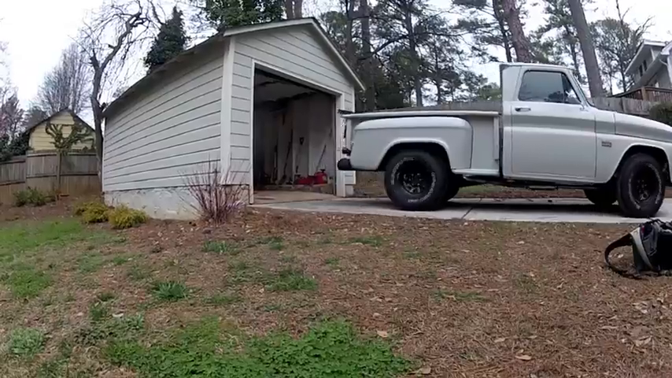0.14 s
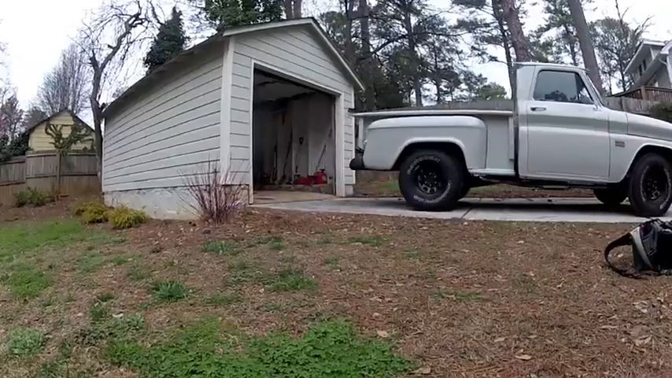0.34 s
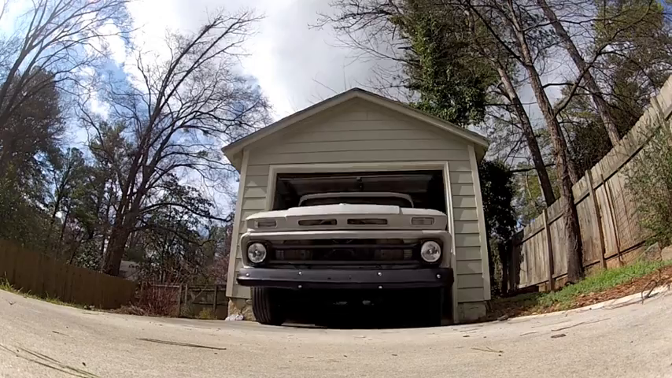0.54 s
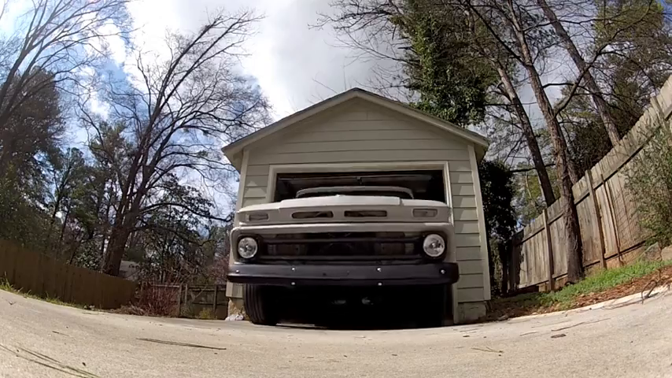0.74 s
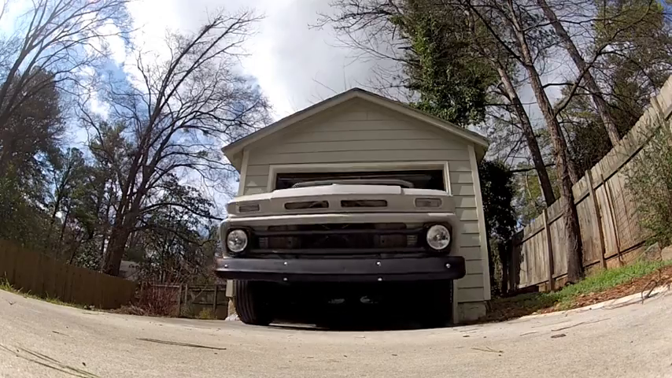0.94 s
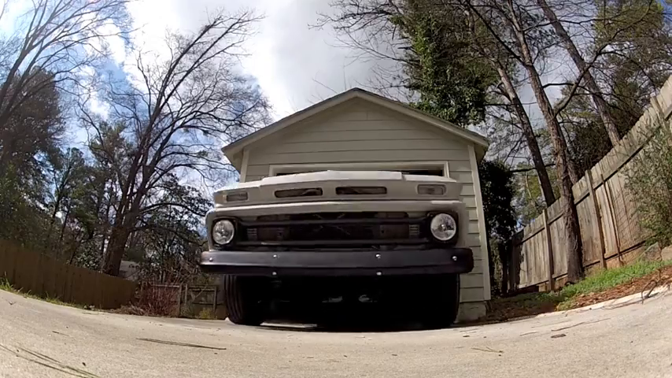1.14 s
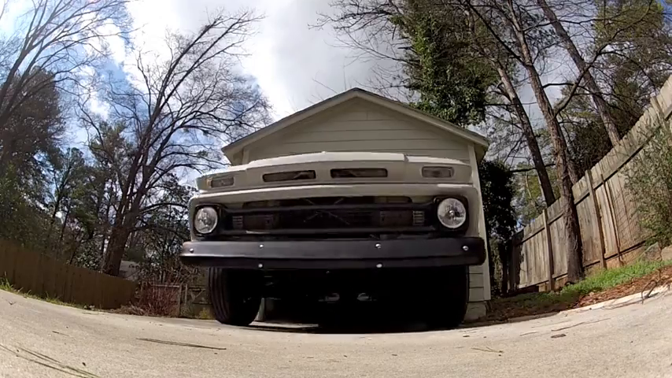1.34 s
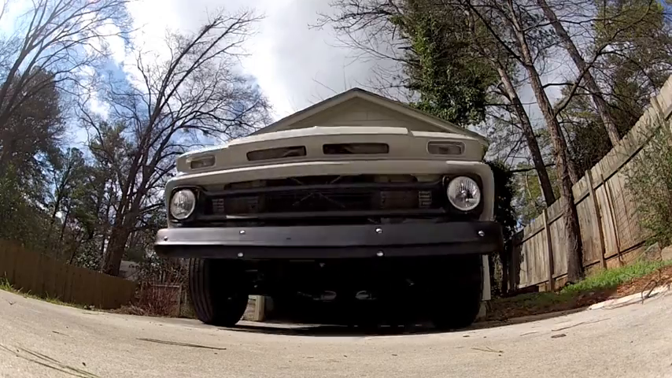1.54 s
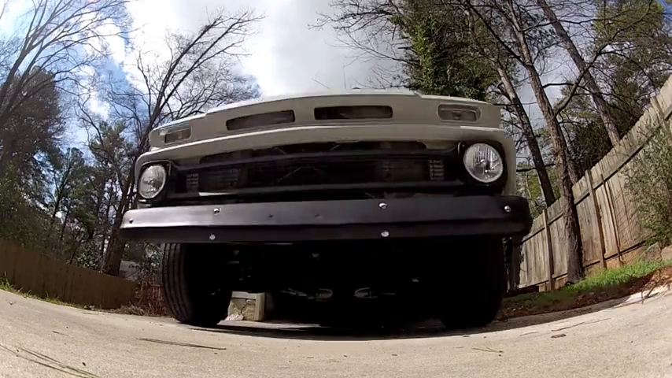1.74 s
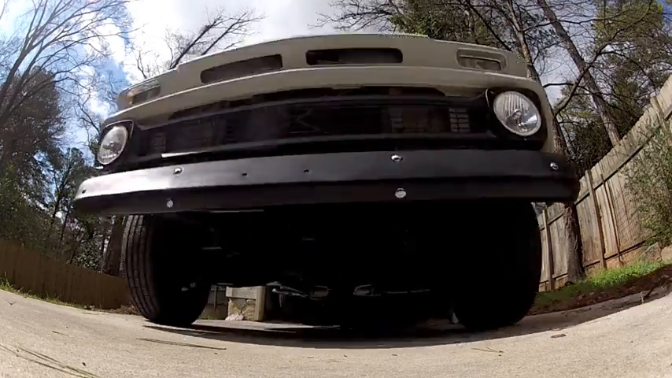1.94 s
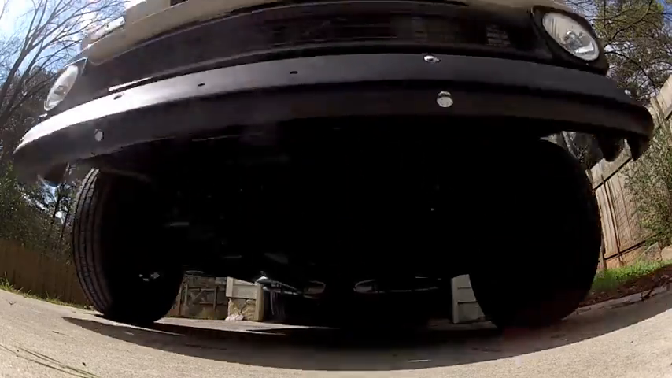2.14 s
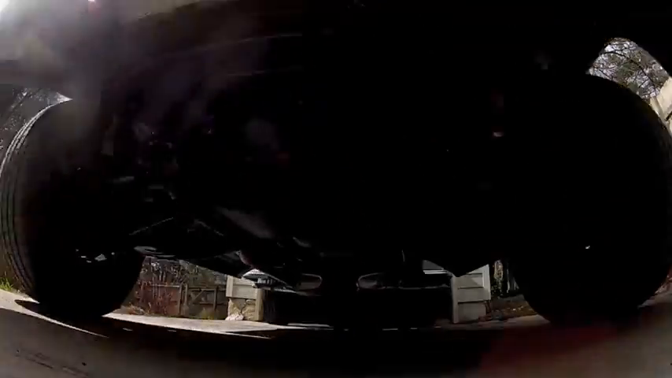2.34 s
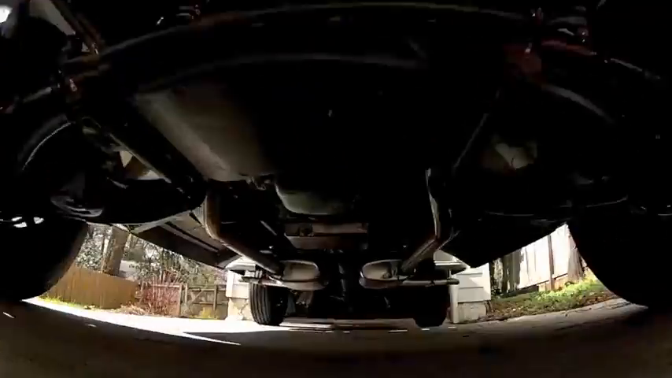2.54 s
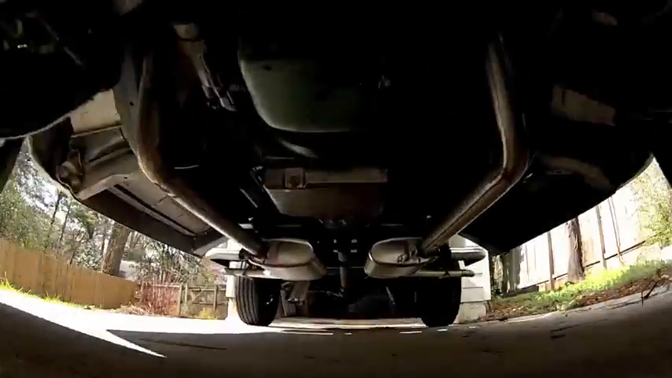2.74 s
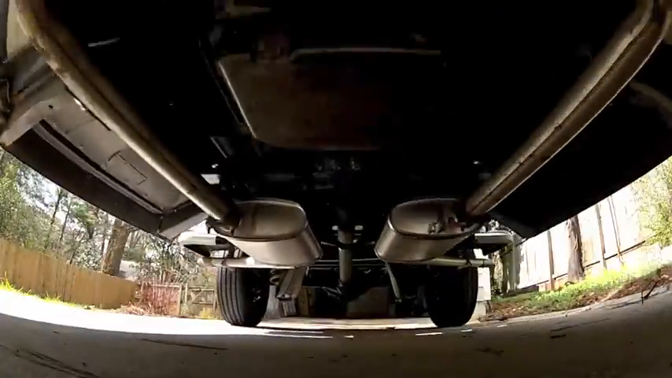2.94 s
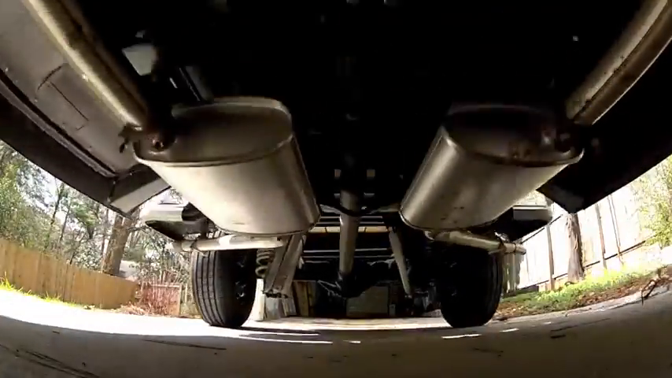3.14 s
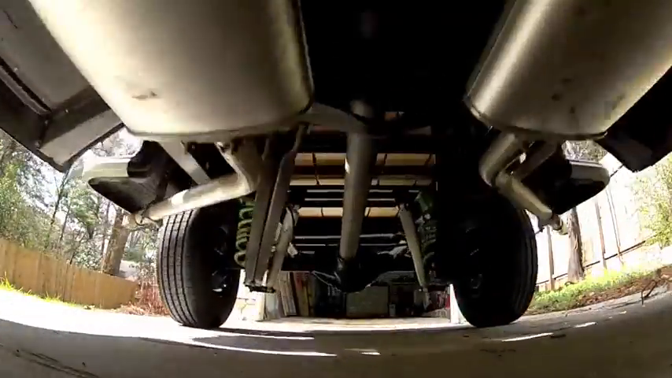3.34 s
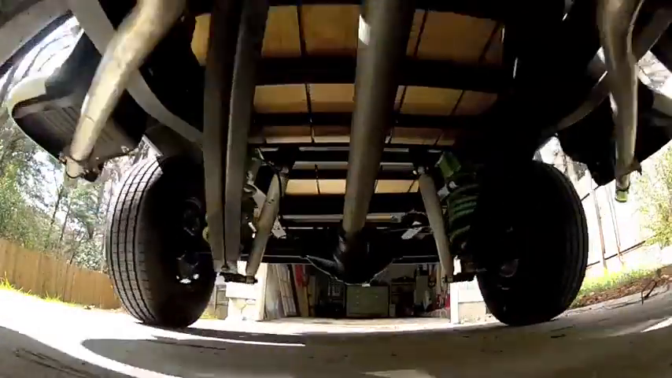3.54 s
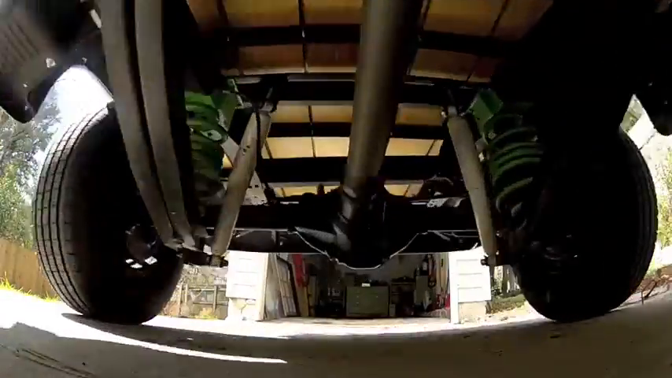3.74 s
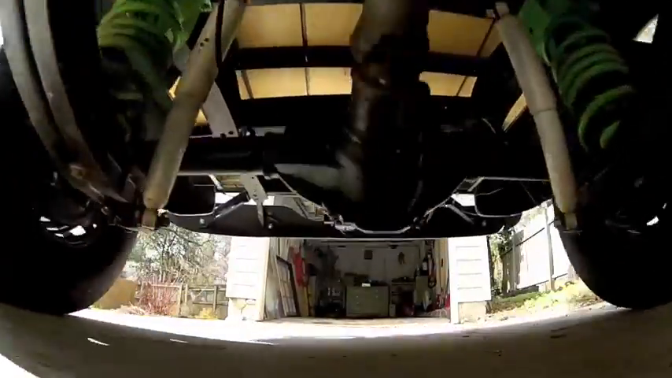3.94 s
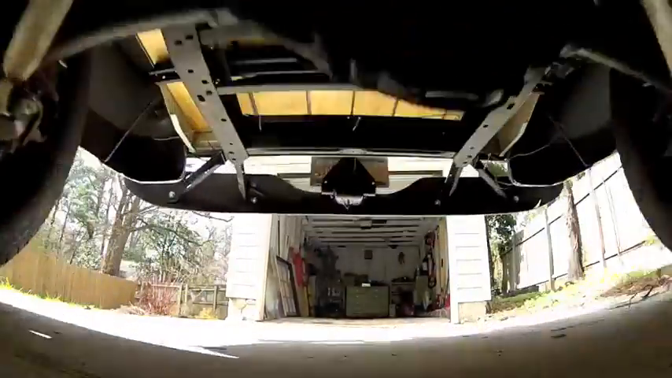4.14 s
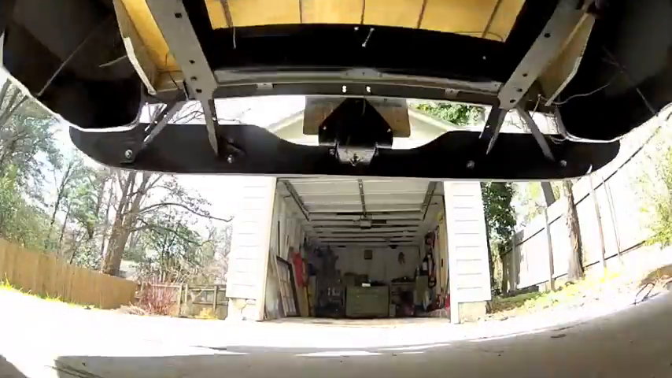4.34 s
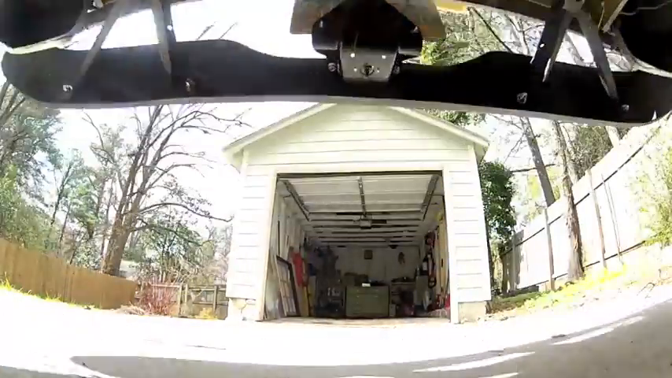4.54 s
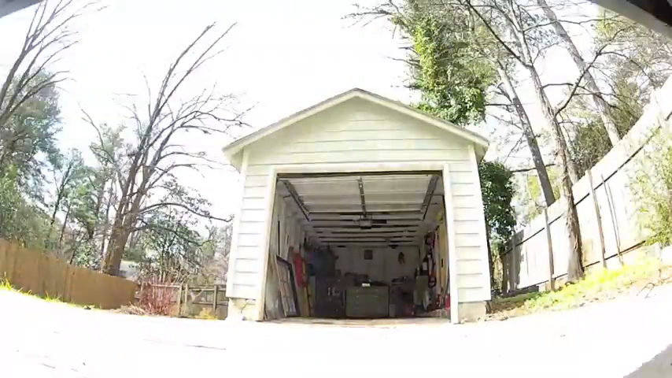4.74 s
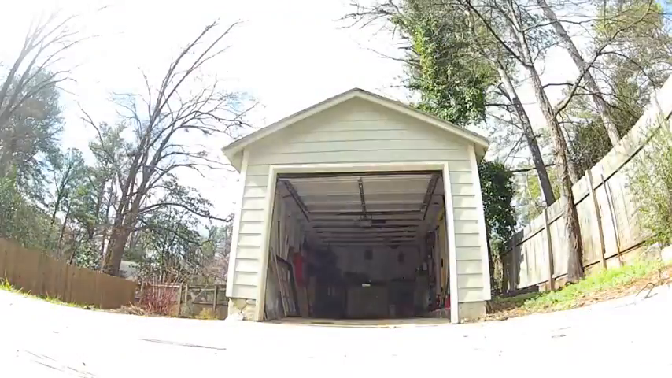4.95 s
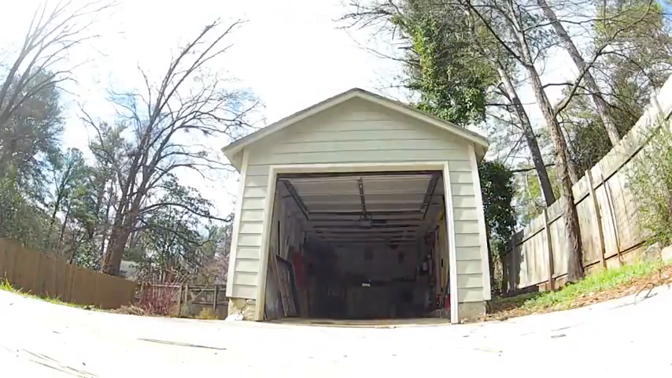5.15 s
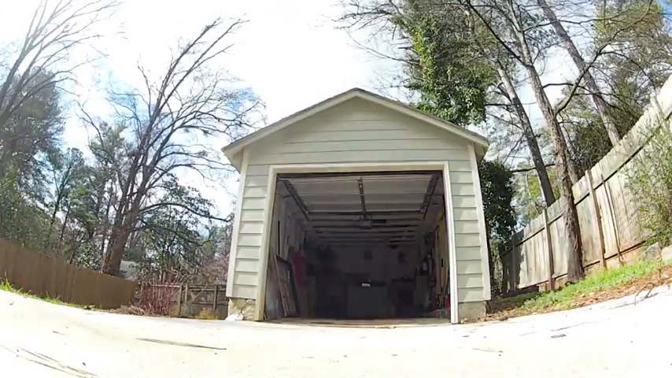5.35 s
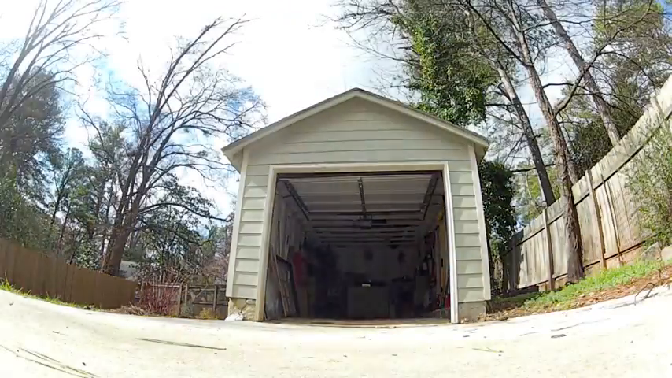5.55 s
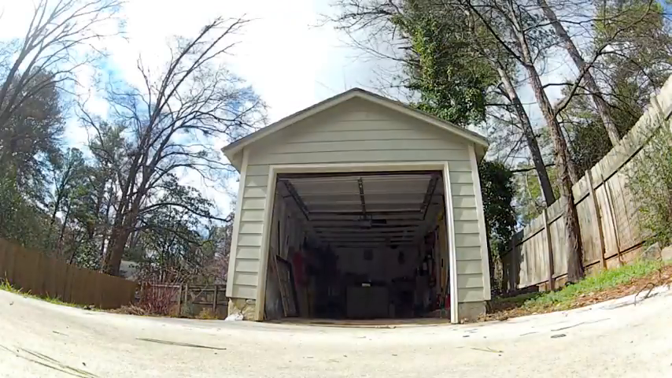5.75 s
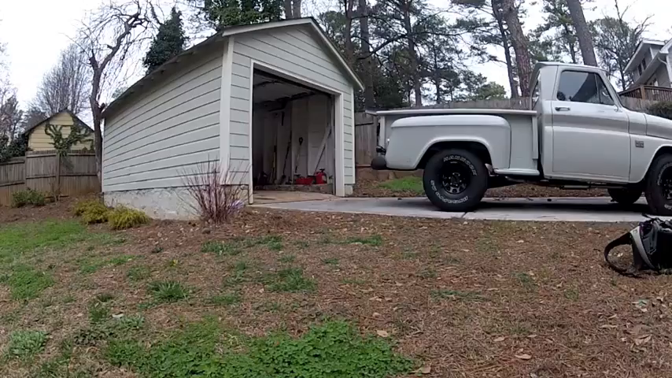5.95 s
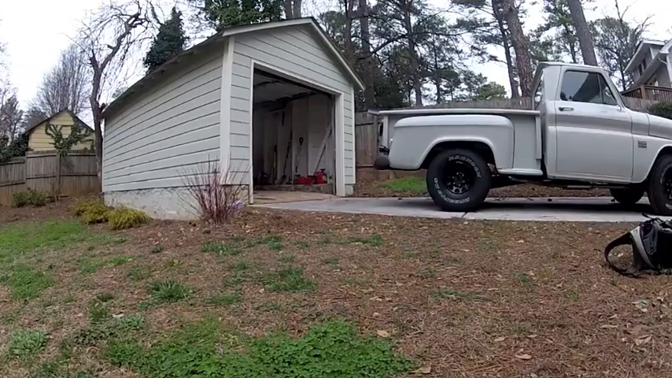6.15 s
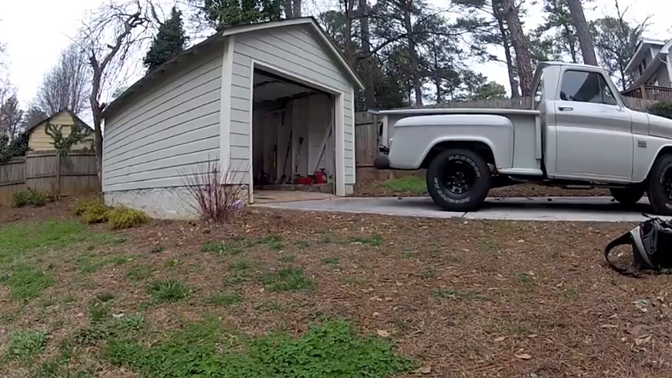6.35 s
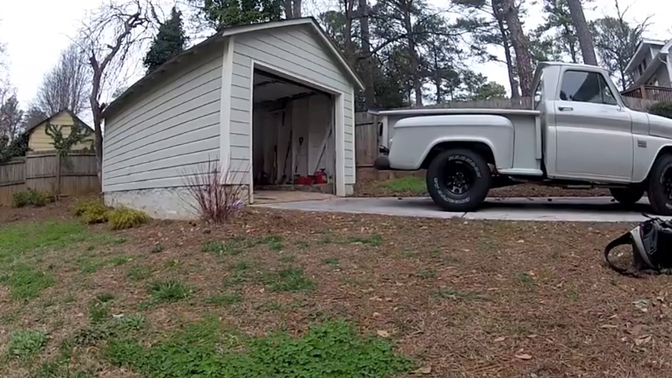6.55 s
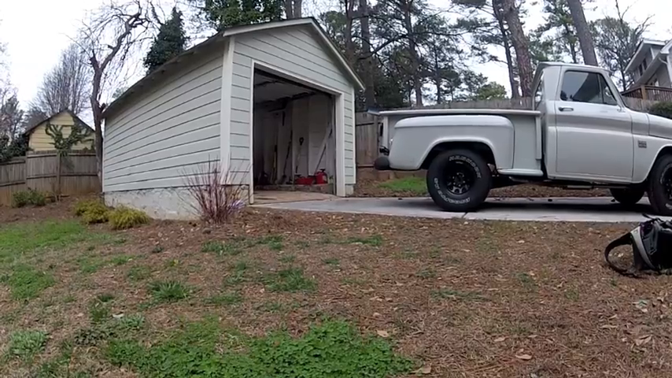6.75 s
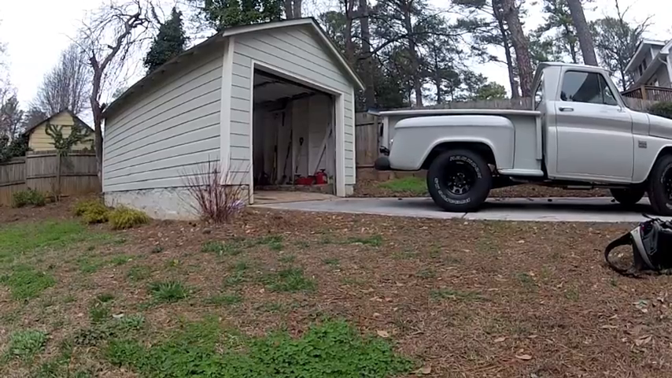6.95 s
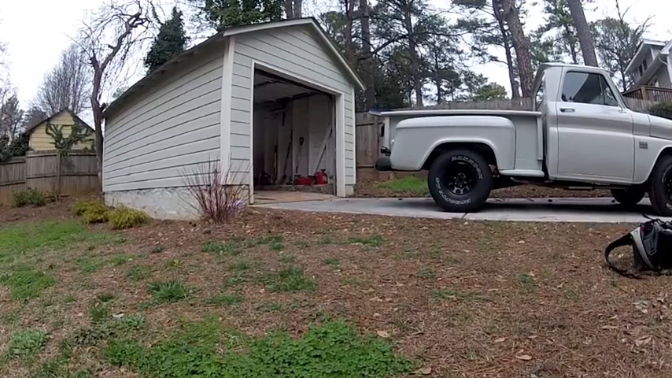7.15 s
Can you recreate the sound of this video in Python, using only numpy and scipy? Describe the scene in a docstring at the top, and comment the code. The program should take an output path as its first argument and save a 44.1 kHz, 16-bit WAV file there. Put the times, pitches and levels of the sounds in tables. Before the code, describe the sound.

A worn truck engine runs throughout with uneven thumping and exhaust hiss. First comes a soft distant idle, then a close low microphone on the concrete catches it approaching, passing overhead at peak loudness around three seconds with crackling pops and a bassy throb, then moving off. The last second returns to the distant, duller, slower idle from the grass.

```python
"""Old eight-cylinder pickup leaving a garage

The pickup idles, heard from the lawn; it then rolls out right over a microphone on the driveway and away; then the
lawn again. Each firing thumps in the pipes and rasps in the exhaust, one bank louder than the other; sharp pops crack
out, over a roar, a rumble and, on the driveway, a boom at the firing rate. Each converter sample is held for
1/12000 s, which mirrors the sound above 6 kHz; each cut fades through silence."""
import sys
import numpy as np
from scipy.fft import rfft, irfft, next_fast_len
from scipy.io import wavfile
from scipy.ndimage import uniform_filter1d

SR = 44100
rng = np.random.default_rng(int(sys.argv[2]) if len(sys.argv) > 2 else 0)


def wav_out(sig):
    """Save sig, one row per channel (or a flat mono array), as 16-bit PCM at SR to the path in sys.argv[1]."""
    wavfile.write(sys.argv[1], SR, np.round(np.clip(np.atleast_2d(sig).T, -1, 1) * 32767).astype(np.int16))


N = 317079
PUFF_SAMPLES = 8192
EARLIER_FIRINGS = 6  # still sounding at the start

# Idle speed, one table per shot (lawn, driveway, lawn). Each row: time in s, engine cycles per s.
SPEED = [
    [(0, 6.55)],
    [(.56, 7.322), (.78, 7.44), (.98, 7.326), (1.27, 7.654), (1.62, 7.478), (1.9, 7.671), (2.5, 7.7534),
     (3.35, 7.644), (3.6, 7.662), (3.86, 7.474), (4.2, 7.663), (4.6, 7.58), (6.03, 7.3369)],
    [(6.04, 6.437), (6.3, 6.567), (6.55, 6.437), (6.75, 6.327), (7, 6.437)],
]
# Shots. Each row: start in s, firing intervals until cylinder one fires.
SHOTS = [(0, 5.4), (.56, .2), (6.04, 2.7)]
# Cuts between shots. Each row: time in s, fade length on each side in s.
CUTS = [(0.557, 0.089), (6.037, 0.1)]
# Cylinders in firing order. Each row: thump offset in dB on the driveway, on the lawn,
# rasp offset in dB on the driveway, on the lawn.
CYLINDERS = [(0.5, -3.5, 2, -7), (-0.6, 1.3, -0.3, -2), (-8, 4, -8, -3), (0.1, -0.2, -1.4, -8.5),
             (-7, -2.5, -17.5, -4.5), (3, 1, -6.5, -0.9), (-0.85, 2.4, -0.5, -13), (-2.2, 3.5, -14, -3.5)]
# Bank of each cylinder in firing order: 0 first, 1 second.
BANKS = [0, 0, 1, 0, 1, 1, 0, 1]
# Second bank's thump, first row driveway, second lawn. Each row: offset in dB, extra delay in s, thin below Hz.
FAR_BANK = [(-8.5, 0.00407, 340), (-6.5, 0.00843, 18)]
# Unequal pipe runs in firing order. Each row: thump lag in ms on the driveway, on the lawn.
THUMP_LAGS = [(.3, .15), (.3, .35), (.55, -.4), (0, -.15), (1.1, .1), (-1.5, -.3), (-.3, -.35), (-.1, .6)]
# Uneven thump arrival, most as the tail pipes pass. Each row: time in s, spread in s.
SCATTER = [(3.5, .00015), (4, .0007), (5.4, .0003)]
# Thump off garage and fence. Each row: delay in s, level in dB.
ECHOES = [(.007, -18), (.027, -8.5)]
# Truck's way out. Each row: time in s, place (0 ahead, 1 engine overhead, 2 tail overhead, 3 behind).
PLACE = [(.56, 0.52), (2.1, 0.74), (2.8, 1.06), (3.45, 1.26), (4.1, 1.73), (4.5, 2.05), (5.1, 3.1)]
# Thump colour at each of the four places, then from the lawn. Each row: frequency in Hz, relative level in dB per Hz.
PIPES = [
    [(25, -48), (44, -18), (66, 0.5), (84, 4), (102, -7), (130, -5.5), (175, 1), (205, 2), (232, -7),
     (269, -28), (296, -18.5), (328, -13), (413, -4), (453, -28), (487, -62), (900, -47), (1170, -71),
     (1980, -120)],
    [(25, -49), (44, -30), (66, 3), (86, 5.5), (108, -5.5), (140, -1), (158, 1), (178, 0), (205, -4),
     (233, -15), (287, 0.5), (308, -6), (340, -1), (400, -13.5), (463, -46), (541, -19), (666, -20.5),
     (900, -17.5), (1170, -52), (1980, -120)],
    [(18, -53), (38, 0), (69, 15.5), (85, 7), (108, -4), (140, 4.5), (173, 10), (226, -14), (285, 3.5),
     (308, -14.5), (340, 0.5), (423, -14), (455, -45), (900, -56), (1170, -85), (1980, -120)],
    [(18, -68), (30, -20), (43, -2), (65, 17), (98, 4), (268, 2), (332, 10.5), (442, -14), (640, -11),
     (759, -36), (900, -43), (1170, -53), (1980, -120)],
    [(15, -96), (25, -1), (43, -4), (52, 7), (71, 3.5), (84, -1), (104, 0), (123, -4), (140, 0.5),
     (155, -4), (177, -0.5), (192, -14.5), (210, -32), (290, -8), (312, -4), (335, -7), (600, -95),
     (657, -23), (900, -30), (1170, -24), (1980, -120)],
]
# Rasp colour at the same five. Each row: frequency in Hz, relative level in dB per Hz.
RASPS = [
    [(260, -27), (450, -11), (671, 18.5), (781, 9.5), (1010, 3.5), (1150, -20), (1560, 7.5), (1680, 5),
     (1760, -21), (1870, 10), (2050, -27), (2200, 14), (2370, 19.5), (2700, -32), (3080, -3.5), (3360, -31),
     (3740, -13), (5580, -30.5), (5950, -33), (7740, -44), (13100, -120)],
    [(260, -22), (450, -2.5), (789, -13.5), (1100, 5.5), (1230, 1.5), (1530, 0), (1890, 4.5), (2230, 6.5),
     (2510, 0), (3050, 3.5), (3360, -4.5), (3660, -0.5), (4300, -9.5), (5460, -7.5), (5950, -17),
     (7740, -9), (13100, -120)],
    [(260, -19), (450, -12), (671, -12.5), (889, -16.5), (969, -9.5), (1540, -12), (1890, 3.5), (2090, -8),
     (2350, 2), (2530, -15), (3050, -11), (3950, -16), (4400, -23.5), (5460, -21), (5950, -40), (7740, -49),
     (13100, -120)],
    [(260, -28), (450, -13.5), (636, -16), (764, -39), (1080, -9), (1220, -19), (1310, -3.5), (1590, -14),
     (1680, -4.5), (1910, -1), (2120, -6.5), (2380, -5.5), (2520, -19.5), (3200, -11.5), (3470, -18),
     (3950, -17.5), (4400, -25), (5950, -29.5), (7740, -66), (13100, -120)],
    [(260, -22), (450, -4.5), (496, -18), (559, -14.5), (616, -28), (806, -20), (1050, -20), (1130, -12),
     (1430, -20), (1620, -8), (1850, -4.5), (2200, -0.5), (2620, -18.5), (3780, -13.5), (4900, -23.5),
     (5950, -33), (7740, -87), (13100, -120)],
]
# Resonances of pipes and mufflers. Each row: centre in Hz, half-width in Hz (dB boost down to 1/e).
MUFFLER = [(66, 31), (150, 28), (185, 35), (290, 41), (340, 29), (372, 10)]
# Their reach as the truck rolls over. Each row: time in s, then dB over the pipes' colour for each resonance.
REACH = [(.6, 7, -1.5, 3.5, 1, -5, -12), (1.5, 2.5, -1, -7, -5.5, -16, -2.5),
         (2.3, 6.5, -1, 3.3, -2.5, -3.5, -5), (2.75, 2, -1, -1, 1, -11.5, -12), (3.1, 4, 0, 2, -9, 4, -10),
         (3.25, 1, -2, 6, -0.5, 0, -8), (3.45, 1, 0.5, -2.5, 2.5, 4.5, -9), (3.75, 1, -3, 4, 1, -1, 2),
         (4.2, -9, -1, -6, -4.5, -8.5, -15), (4.45, -4, -5.5, 3, -2, -3, -10),
         (4.9, -5, -3.5, 0, -3, -3, -8), (5.9, 2, 4.5, -1.2, -7.5, -1, -2)]
# Engine bay, mufflers, tail pipes. Each row: time overhead in s, thump level in dB, rasp level in dB.
PARTS = [(2.91, -18, -27), (3.56, -26, -26.5), (4.47, -30.5, -28.5)]
# Base levels from the lawn: thump in dB, rasp in dB.
LAWN_DB = (-42, -46.5)
# Shaking body. Each row: frequency in Hz, relative level in dB per Hz.
RUMBLE = [(12, -11), (22, -22), (40, -14), (100, -36), (200, 9.5), (330, -1.5), (480, -8.5), (900, -11.5),
          (1500, -60.5)]
# Sharp exhaust pops. Each row: time in s, energy in dB, ring in Hz.
POPS = [(0.2009, -15, 2270), (0.617, -9, 2250), (0.666, -11, 1630), (0.7206, -5.5, 2240),
        (1.2578, -11, 2260), (1.4212, -12, 2390), (1.6445, -8.5, 2440), (1.787, -1, 2380),
        (2.0329, -4, 2400), (2.0827, -13, 2210), (2.177, -3.5, 1800), (2.2067, -1, 2290),
        (2.2885, -13, 3700), (2.3361, 3, 2240), (2.4178, -0.5, 2340), (2.462, 5.5, 2310), (2.5587, 7, 1923),
        (2.5934, 4.5, 2100), (2.6757, 7.5, 2360), (2.7721, 2.5, 2370), (2.82, 9.5, 1890),
        (2.855, 6.5, 2210), (2.9, 13.5, 2210), (2.9347, 12.5, 2110), (2.953, 6.5, 2190), (2.9819, 13, 2240),
        (3.0308, 10.5, 1960), (3.0657, 13, 2283), (3.0793, 6, 2240), (3.112, 7.5, 1930), (3.1622, 9, 2340),
        (3.1952, 10, 2340), (3.211, 6.5, 2210), (3.242, 6, 2020), (3.291, -1, 1790), (3.3264, 10, 2777),
        (3.344, -1, 1850), (3.3762, 5, 3550), (3.422, 0, 1880), (3.457, 7.5, 2040), (3.474, -10, 2260),
        (3.506, 5.5, 2840), (3.5874, 6.5, 3770), (3.604, 5, 1980), (3.6396, 8.5, 2220), (3.685, 8, 2310),
        (3.7203, 5, 3920), (3.744, 9, 1870), (3.82, 2, 1930), (3.868, -1, 2240), (3.9534, 3, 2100),
        (3.99, 4, 2010), (4.034, 3, 1990), (4.087, 1, 2200), (4.122, 5, 1890), (4.163, 7.5, 2270),
        (4.216, -1, 2930), (4.244, 0, 1750), (4.344, 5.5, 1915), (4.382, 7.5, 1870), (4.397, 4.5, 1920),
        (4.428, -1.5, 2230), (4.4784, -5, 1970), (4.5171, -6, 2070), (4.5565, -10, 2350),
        (4.6089, -8, 1900), (4.7421, -7, 1960), (4.7934, -12, 2040), (4.9601, 0, 2160), (5.0419, -4, 1970),
        (5.096, -1.5, 2350), (5.1738, -4, 1930), (5.3113, -8, 1704), (5.455, -3.5, 1870),
        (5.5938, -3, 1770), (5.626, -5, 2310), (5.68, -9, 1740), (5.727, -7, 2070), (5.762, -7, 2286),
        (5.8151, -5.5, 2150), (5.866, -1.5, 1920), (5.9, -8.5, 2280), (6.14, -19, 2240),
        (6.4408, -15, 2250), (6.4986, -22, 2220)]

ROLL_M_PER_S, CLEARANCE_M = 2.2, 0.78  # clearance: microphone up to the underbody
BOOM_OVERHEAD_S, BOOM_DB = 2.97, -21.5  # rms level when overhead
SHADE_START_S, SHADE_DB_PER_S = 3.65, 66  # the truck's rear then shades the boom
POP_ATTACK_S, BLUR_S_PER_M = 0.0004, 0.00026  # rise of a pop up close, and blurring with distance
HOLD_HZ, TOP_HZ = 12000, 15300  # converter rate, start of the top cut
PUFF_T = np.arange(PUFF_SAMPLES) / SR
PUFF_HZ = np.fft.rfftfreq(PUFF_SAMPLES, 1 / SR)


def amp(db):
    """Amplitude ratio from dB."""
    return 10 ** (np.asarray(db) / 20)


def read(rows, s):
    """Columns after the time, interpolated at times s."""
    t, *cols = np.transpose(rows)
    return np.array([np.interp(s, t, c) for c in cols])


def speed(shot, s):
    """Engine cycles per second at times s."""
    return np.choose(shot, [read(table, s)[0] for table in SPEED])


def crank():
    """Shot number and firing count at every sample: engine speed integrated, restarted at each shot."""
    t = np.arange(N) / SR
    start_s, wait = np.transpose(SHOTS)
    shot = np.searchsorted(start_s, t, "right") - 1
    turned = len(CYLINDERS) * np.cumsum(speed(shot, t)) / SR
    at_start = turned[(start_s * SR).astype(int)]
    return shot, turned - at_start[shot] - wait[shot]


def away_db(s, overhead_s):
    """Loss with distance from a part of the rolling truck (inverse square)."""
    return -10 * np.log10(1 + (ROLL_M_PER_S * (s - overhead_s) / CLEARANCE_M) ** 2)


def loudness(times, lawn):
    """Thump and rasp levels: the parts add in power on the driveway, steady on the lawn."""
    overhead_s, *levels_db = np.transpose(PARTS)
    power = amp(levels_db) ** 2 @ amp(away_db(times, overhead_s[:, None])) ** 2
    return np.where(lawn, np.array(LAWN_DB)[:, None], 10 * np.log10(power))


def firings():
    """Time, place, cylinder, burn and base levels of every firing: one per whole step of the count."""
    shot, count = crank()
    at = np.flatnonzero(np.diff(np.floor(count)) == 1)
    back = np.arange(EARLIER_FIRINGS, 0, -1)
    first_rate_hz = len(CYLINDERS) * SPEED[0][0][1]
    times = np.r_[at[0] / SR - back / first_rate_hz, at / SR]
    number = np.r_[count[at[0] + 1] - back, count[at + 1]]
    cylinder = np.floor(number).astype(int) % len(CYLINDERS)
    shot = shot[np.r_[0 * back, at]]
    lawn = shot != 1
    # energy of one firing that gives the mean power
    per_firing_db = 10 * np.log10(SR / (len(CYLINDERS) * speed(shot, times)))
    thump_db, rasp_db = loudness(times, lawn) + per_firing_db
    # no two charges burn alike: shared level, rasp level, thump timing
    burn = rng.standard_normal((len(times), 3))
    return times, lawn, cylinder, burn, thump_db, rasp_db


def along(points):
    """(Hz, dB) points on a log axis, read on the frequency grid of one puff."""
    hz, db = np.transpose(points)
    return np.interp(np.log(PUFF_HZ + 1), np.log(hz + 1), db)


def heard(spectra, times, lawn):
    """Colour at each time: a blend by the truck's place, or the lawn's."""
    *drive, side = [along(points) for points in spectra]
    place = np.clip(read(PLACE, times)[0], 0, len(drive) - 1)[:, None]
    blend = sum(np.maximum(1 - abs(place - k), 0) * db for k, db in enumerate(drive))
    return np.where(lawn[:, None], side, blend)


def blotches(rows, width_hz, depth_db):
    """A new random colour for every puff: smoothed noise along frequency."""
    size = max(int(width_hz * PUFF_SAMPLES / SR), 1)
    field = uniform_filter1d(rng.standard_normal((rows, len(PUFF_HZ))), size, axis=1)
    return depth_db * field / field.std()


def causal(db):
    """Minimum-phase response for each row of dB gains, by folding the cepstrum."""
    cepstrum = irfft(np.maximum(db, -90) * np.log(10) / 20, PUFF_SAMPLES)
    cepstrum[:, 1:PUFF_SAMPLES // 2] *= 2
    cepstrum[:, PUFF_SAMPLES // 2 + 1:] = 0
    return np.exp(rfft(cepstrum))


def lay(times, db, push, colour_db):
    """Each push through its own colour, scaled to an energy in dB, placed at its time."""
    puffs = irfft(rfft(push, PUFF_SAMPLES) * causal(colour_db), PUFF_SAMPLES)
    puffs *= (amp(db) / np.linalg.norm(puffs, axis=1))[:, None]
    # one puff of padding in front takes early starts
    at = (times * SR).astype(int)[:, None] + np.arange(PUFF_SAMPLES) + PUFF_SAMPLES
    return np.bincount(at.ravel(), puffs.ravel(), N + PUFF_SAMPLES)[PUFF_SAMPLES:N + PUFF_SAMPLES]


def gust(rows, attack_s, t60_s, wash_db, wash_t60_s):
    """Noise with a sharp front, over a longer wash off the ground and walls."""
    shape = amp(-60 * PUFF_T / t60_s) + amp(wash_db - 60 * PUFF_T / wash_t60_s)
    return shape * (1 - np.exp(-PUFF_T / attack_s)) * rng.standard_normal((rows, PUFF_SAMPLES))


def swell(rows, length_s):
    """Noise that rises and falls softly, so that neighbours merge."""
    return np.sin(np.pi * np.clip(PUFF_T / length_s, 0, 1)) * rng.standard_normal((rows, PUFF_SAMPLES))


def blur_s(times):
    """Extra rise time of a puff: walls and ground smear its front as the truck is further off."""
    metres = ROLL_M_PER_S * np.clip(abs(times - PARTS[1][0]) - .9, 0, 1.6)
    return BLUR_S_PER_M * metres[:, None]


def muffler_db(times, lawn):
    """Pipe and muffler resonances swell and fade with the truck's place, on the driveway only."""
    centre_hz, width_hz = np.transpose(MUFFLER)[:, :, None]
    peaks = np.exp(-((PUFF_HZ - centre_hz) / width_hz) ** 2)
    return read(REACH, times).T * ~lawn[:, None] @ peaks


def thumps(times, lawn, cylinder, burn, thump_db):
    """Each firing's pressure step and its echoes ring through the pipes; the second bank is late and thin."""
    rows, seat = len(times), lawn.astype(int)
    far_db, far_s, thin_hz = np.array(BANKS)[cylinder] * np.array(FAR_BANK)[seat].T
    push = amp(-43) * gust(rows, attack_s=.003, t60_s=.06, wash_db=-8, wash_t60_s=.3)
    push[:, 0] = -1  # the pressure first drops at the microphone
    for delay_s, db in ECHOES:
        push[:, int(delay_s * SR)] = -amp(db)
    lag_s = np.array(THUMP_LAGS)[cylinder, seat] / 1000
    late_s = .0043 + far_s + lag_s + read(SCATTER, times)[0] * burn[:, 2]
    thin_db = -10 * np.log10(1 + (thin_hz[:, None] / (PUFF_HZ + 1)) ** 2)
    colour_db = heard(PIPES, times, lawn) + blotches(rows, width_hz=60, depth_db=1)
    colour_db = colour_db + muffler_db(times, lawn) + thin_db
    own_db = np.array(CYLINDERS)[cylinder, seat]
    level_db = thump_db + own_db + far_db + .9 * burn[:, 0]
    return lay(times + late_s, level_db, push, colour_db)


def rasps(times, lawn, cylinder, burn, rasp_db):
    """Each firing's exhaust hiss, with narrow random peaks: sheet metal rings on."""
    rows = len(times)
    hiss = gust(rows, attack_s=.0023 + blur_s(times), t60_s=.089, wash_db=-31, wash_t60_s=.19)
    own_db = np.array(CYLINDERS)[cylinder, 2 + lawn]
    burn_db = .7 * burn[:, 0] + np.where(lawn, 2.2, 1.3) * burn[:, 1]
    colour_db = heard(RASPS, times, lawn) + blotches(rows, width_hz=180, depth_db=4)
    rings_db = blotches(rows, width_hz=35, depth_db=4.5)
    return lay(times, rasp_db + own_db + burn_db, hiss, colour_db + rings_db)


def roar(times, lawn, rasp_db):
    """Fan and intake fill the gaps: soft overlapping noise in the rasp's colour."""
    return lay(times, rasp_db - 10, swell(len(times), length_s=.063), heard(RASPS, times, lawn))


def rumble(times, lawn, thump_db):
    """The shaking body: soft overlapping noise in one fixed colour."""
    level_db = thump_db - np.where(lawn, 14, 16)
    colour_db = np.tile(along(RUMBLE), (len(times), 1))
    return lay(times, level_db, swell(len(times), length_s=.089), colour_db)


def pops():
    """Some puffs crack out of the exhaust: sharp gusts ringing at one pitch each."""
    times, db, ring_hz = np.transpose(POPS)
    ring_db = 17 / (1 + ((PUFF_HZ - ring_hz[:, None]) / 80) ** 2)
    lawn = crank()[0][(times * SR).astype(int)] != 1
    attack_s = POP_ATTACK_S + blur_s(times)
    crack = gust(len(times), attack_s, t60_s=.037, wash_db=-12.5, wash_t60_s=.47)
    colour_db = heard(RASPS, times, lawn) + ring_db + blotches(len(times), width_hz=300, depth_db=4)
    return lay(times, db, crack, colour_db)


def boom():
    """Sine at the firing rate, driveway only: grows and fades with distance, then shaded by the rear."""
    shot, count = crank()
    t = np.arange(N) / SR
    shade_db = SHADE_DB_PER_S * np.maximum(t - SHADE_START_S, 0)
    level_db = BOOM_DB + away_db(t, BOOM_OVERHEAD_S) - shade_db
    return np.sqrt(2) * amp(level_db) * (shot == 1) * np.cos(2 * np.pi * (count - .88))


def scene():
    """All layers, alike on both channels."""
    times, lawn, cylinder, burn, thump_db, rasp_db = firings()
    mono = thumps(times, lawn, cylinder, burn, thump_db)
    mono += rasps(times, lawn, cylinder, burn, rasp_db)
    mono += roar(times, lawn, rasp_db)
    mono += rumble(times, lawn, thump_db)
    mono += pops()
    mono += boom()
    return np.tile(mono, (2, 1))


def record(dry):
    """Fades at the cuts, a converter that holds its samples, and the band limit."""
    t = np.arange(N) / SR
    fades = np.prod([np.clip(abs(t - s) / length, 0, 1) for s, length in CUTS], axis=0)
    m = next_fast_len(N + PUFF_SAMPLES)
    hz = np.fft.rfftfreq(m, 1 / SR)
    hold = np.sinc(hz / HOLD_HZ)
    # cut at half the rate, hold's droop made up beforehand
    band = irfft(rfft(dry * fades, m) * (hz < HOLD_HZ / 2) / hold.clip(.5), m)[:, :N]
    sampled = band * (1 + 2 * np.cos(2 * np.pi * HOLD_HZ * t))  # mirrors the band around the rate
    skirt = amp(-40 * np.clip((hz - TOP_HZ) / 500, 0, 4))
    return irfft(rfft(sampled, m) * hold * skirt, m)[:, :N]


dry = scene()
out = record(dry)
wav_out(out)
```